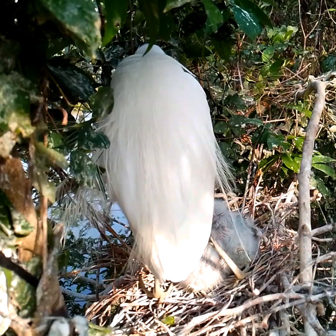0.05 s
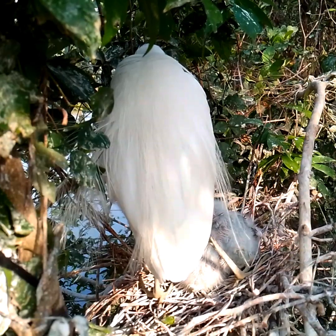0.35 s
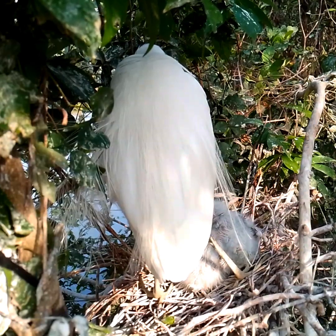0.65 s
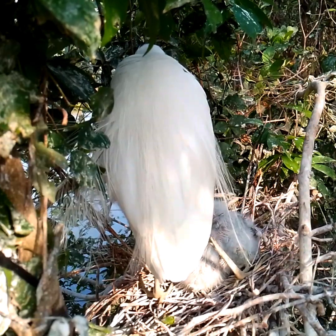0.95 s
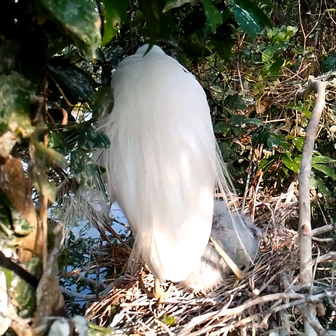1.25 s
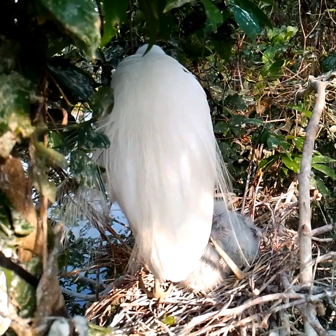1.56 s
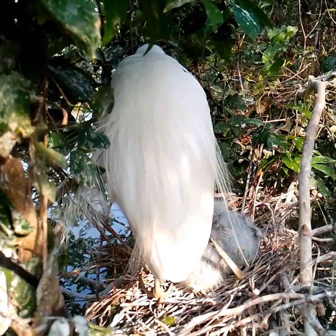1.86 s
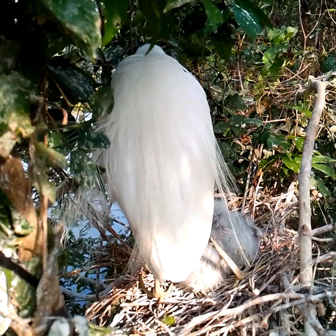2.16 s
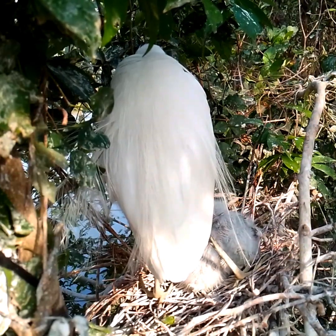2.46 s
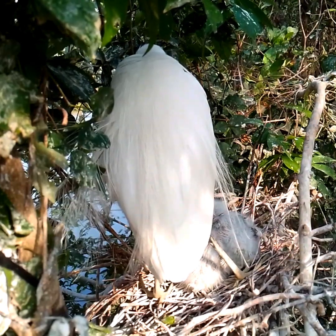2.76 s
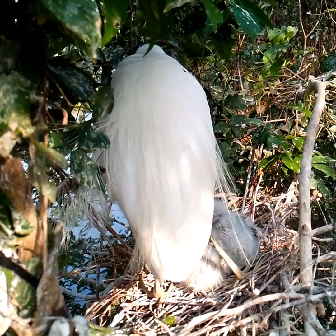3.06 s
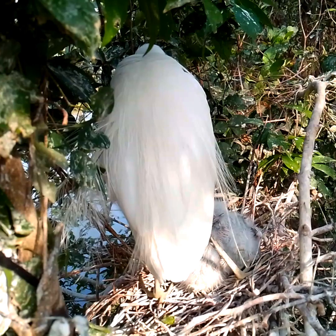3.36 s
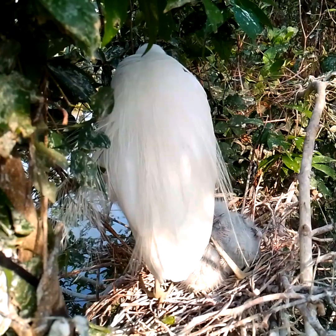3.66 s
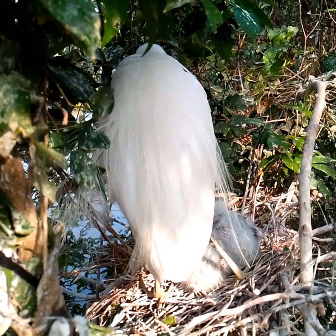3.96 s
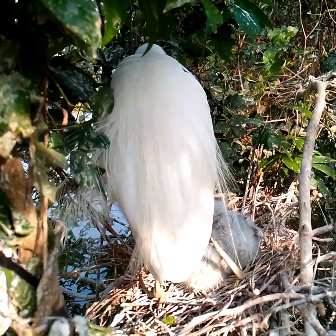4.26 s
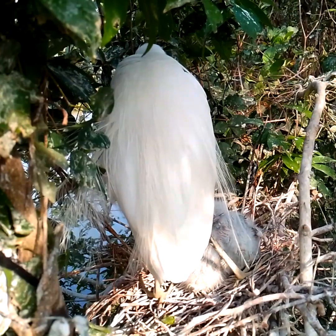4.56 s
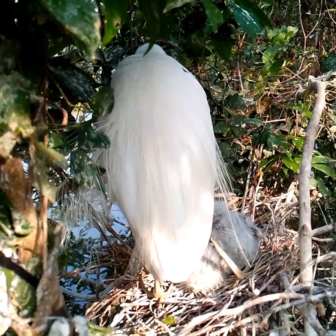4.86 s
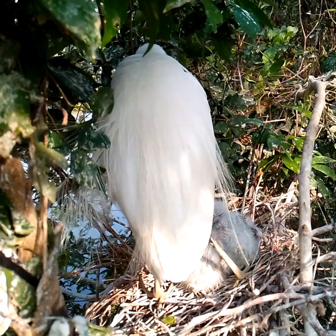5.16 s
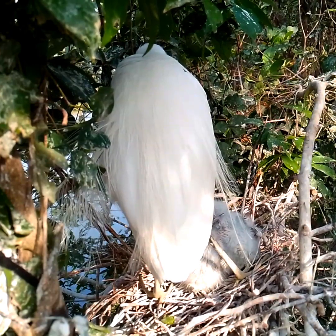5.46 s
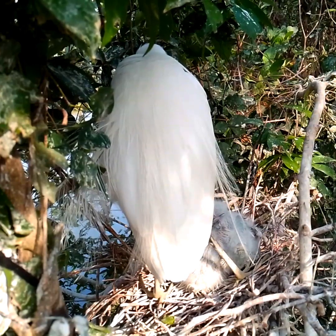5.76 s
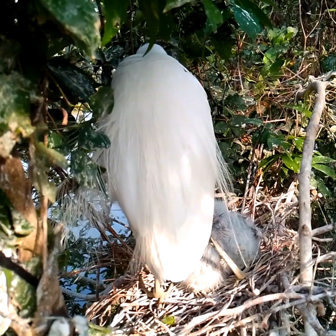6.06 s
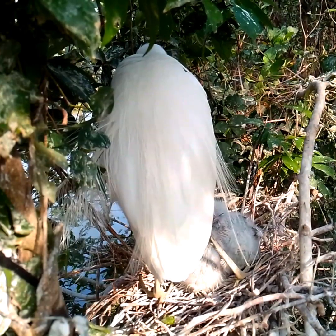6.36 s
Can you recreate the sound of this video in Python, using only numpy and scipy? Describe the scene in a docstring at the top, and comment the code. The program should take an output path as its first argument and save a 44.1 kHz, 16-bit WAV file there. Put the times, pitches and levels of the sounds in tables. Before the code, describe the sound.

Two egret chicks beg from a nest among trees. One keeps up quick, high, falling kek calls throughout; the other adds sharp, stuttering chips at the start and again at the end. Short hoarse squawks break in, the loudest ending in a clear squeal, the next loudest in a thin rustle. A stereo microphone picks up a slight scatter from the foliage and a faint outdoor hush.

```python
"""Among trees, near an egret nest, on a stereo microphone over a faint outdoor hush.
Two chicks beg, one in quick, falling 'kek' calls, one in sharp, stuttering chips: puffs of air from
the syrinx, coloured by throat and mouth. Hoarse squawks break in; the loudest ends in a clear squeal,
the next loudest in a thin rustle. The foliage scatters every call on its way to the microphone,
whose two ports colour the treble differently."""
import sys
import numpy as np
from scipy import signal
from scipy.fft import rfft, irfft, next_fast_len
from scipy.io import wavfile
from scipy.ndimage import map_coordinates

SR = 44100
rng = np.random.default_rng(int(sys.argv[2]) if len(sys.argv) > 2 else 0)


def unload_audio(sound):
    """Save the sound as a 16-bit wav file, at the path given as the first command line argument."""
    columns = np.transpose(np.atleast_2d(sound))
    # keep every value between -1 and 1, then stretch to whole-number steps
    steps = np.round(np.clip(columns, -1, 1) * 32767)
    wavfile.write(sys.argv[1], SR, steps.astype(np.int16))


N = 287532

# spectrum of the outdoor hush: frequency_hz, gain_db
HUSH_COLOUR = [(20, -26), (40, -13), (65, -3.5), (100, -11), (160, -19), (310, -5), (800, -12.5),
               (1560, -16.5), (2860, -6.5), (4480, -11.5), (7820, -5.5), (9410, -17), (11000, -15),
               (14000, -29)]
# decay among the trees: frequency_hz, t60_s
TREE_DECAY = [(300, 0.33), (2500, 0.35), (7500, 0.41), (13000, 0.38)]
# leaves throw back short waves best: frequency_hz, gain_db
LEAF_SCATTER = [(300, -17), (1200, 2.5), (1750, 0.5), (2250, -1), (2850, 5.5), (3400, 0), (3900, 8),
                (4550, 0.5), (5600, 2), (7600, 2), (13000, 9)]
# port balance for the chips, and for all else: frequency_hz, left_minus_right_db
CHIP_BALANCE = [(1000, 0.5), (2000, -1), (3000, 1), (4400, 10.5), (5300, -8), (6200, 26), (7100, 13),
                (8000, 28), (9300, -9), (10700, -12), (12500, -38), (14000, 22)]
NEST_BALANCE = [(1000, 1), (2000, -0.5), (3000, 2), (4400, 1.5), (5300, 6), (6200, 11), (7100, 20),
                (8000, 13), (9300, 2.5), (10700, -18.5), (12500, -12), (14000, 3)]
# rustles in the nest: start_s, length_s, level_db, release_s
RUSTLE_STROKES = [(2.767, 0.094, -51, 0.2), (2.909, 0.013, -49, 0.016)]
# spectrum of a rustle: frequency_hz, gain_db
RUSTLE_SPECTRUM = [(200, -36), (400, -9), (900, -14.5), (1500, -20), (3000, -8), (4600, -5.5), (6500, -6.5),
                   (7800, 8.5), (9300, -10.5), (11000, 2), (12300, -9.5), (13500, -24)]
# throat colour of each kind of call: frequency_hz, gain_db
SQUAWK_COLOUR = [(170, -54), (360, -13), (650, -12), (1100, 4), (1500, -1.5), (2200, -6), (2700, -5.5),
                 (3800, -7), (4700, -5), (6200, -7), (7500, 4), (9300, -10.5), (11000, -4), (13000, -32)]
CHIP_COLOUR = [(400, -35.5), (1200, -21), (2200, -9.5), (2750, -7.5), (3400, -6.5), (4500, -15),
               (5300, -9.5), (6400, -10), (7150, 1.5), (7900, -10.5), (9400, -30), (10800, -22.5),
               (12000, -33), (13500, -50)]
KEK_COLOUR = [(250, -31), (600, -16), (1400, -12.5), (1900, -4.5), (2300, -7), (2850, -7), (4000, -7.5),
              (4650, -7.5), (5500, -4.5), (6500, -10.5), (7900, 2), (9300, -17), (10800, -7.5),
              (13000, -26)]
# squawks, most swelling to their end: start_s, length_s, swell_db, throat_db, voice_db, hiss_db
SQUAWK_CALLS = [(0.523, 0.099, -1, -63, -66, -60.5), (1.023, 0.115, 0, -46, -42, -38.5),
                (1.556, 0.09, 2.5, -65.5, -73, -67), (2.43, 0.13, 8.5, -55, -58.5, -56),
                (2.556, 0.1, 8, -53.5, -43.5, -40), (4.374, 0.059, 4, -54, -57, -53),
                (4.765, 0.1, 4.5, -56.5, -60, -53), (5.071, 0.041, 6, -66, -63, -67)]
# croaks in the two loud squawks, and the squeal: start_s, length_s, level_db, pitch_hz, sag_hz_per_s
CROAK_CALLS = [(1.03, 0.025, -45, 510, 3480), (1.075, 0.055, -54, 372, 200), (2.575, 0.085, -43.5, 462, 60)]
SQUEAL_CALLS = [(1.134, 0.038, -31.5, 1040, 600)]
# their harmonics: multiple, relative_db
CROAK_HARMONICS = [(1, -7), (2, -7), (3, -14), (4, 6), (5, 6), (6, 4), (7, 2), (8, 2.5)]
SQUEAL_HARMONICS = [(1, -9.5), (2, -8), (3, -6), (4, -9.5), (5, -19), (6, -36), (7, -1), (8, -4), (9, -18),
                    (10, -13), (11, -9), (12, -20.5)]
# begging calls of the two chicks; the chip at 1.039 s is a sharp click within the loud squawk: start_s,
# length_s, relative_db, mouth_hz
CHIP_CALLS = [(0.114, 0.02, -45, 2830), (0.318, 0.019, -45, 2928), (0.525, 0.019, -47, 2736),
              (0.655, 0.014, -61, 2670), (0.766, 0.013, -50.5, 2694), (1.039, 0.0113, -41.5, 3270),
              (6.307, 0.019, -44, 2772), (6.507, 0.014, -44.5, 2636)]
KEK_CALLS = [(0.0, 0.02, -57, 2700), (0.07, 0.035, -55.5, 2660), (0.166, 0.027, -56, 2690),
             (0.248, 0.015, -59, 2670), (0.418, 0.012, -57, 2760), (0.58, 0.017, -52, 2733),
             (0.83, 0.028, -53, 2610), (0.91, 0.017, -42, 2830), (1.21, 0.0164, -41, 2770),
             (1.378, 0.032, -55, 2613), (1.475, 0.017, -50.5, 2772), (1.612, 0.026, -60, 3195),
             (1.692, 0.016, -51.5, 3026), (1.846, 0.016, -61, 2810), (1.901, 0.016, -49, 2905),
             (2.086, 0.023, -57.5, 2914), (2.226, 0.011, -59.5, 2934), (2.31, 0.029, -46, 3355),
             (2.438, 0.037, -57, 2656), (2.546, 0.023, -45.5, 2860), (2.758, 0.018, -40, 3027),
             (3.21, 0.021, -59, 2675), (3.358, 0.0083, -52.5, 3225), (3.484, 0.023, -55, 2580),
             (3.528, 0.036, -60, 2580), (3.665, 0.025, -50.5, 3060), (3.733, 0.05, -53.5, 2854),
             (3.906, 0.054, -51, 2870), (3.998, 0.015, -46.5, 2886), (4.139, 0.013, -45.5, 2863),
             (4.263, 0.01, -48, 2802), (4.36, 0.014, -50, 2798), (4.512, 0.023, -52.5, 2870),
             (4.748, 0.021, -55.5, 2856), (4.983, 0.022, -50.5, 3047), (5.128, 0.007, -58.5, 2380),
             (5.209, 0.011, -50.5, 2843), (5.336, 0.012, -60, 2980), (5.248, 0.018, -48, 2840),
             (5.474, 0.016, -47, 2893), (5.693, 0.013, -47.5, 2760), (5.736, 0.026, -49, 2690),
             (5.893, 0.02, -53.5, 2580), (5.929, 0.016, -44, 2770), (6.01, 0.018, -50, 2856),
             (6.102, 0.021, -45.5, 2580), (6.182, 0.012, -43.5, 2740), (6.27, 0.022, -50.5, 2840)]
# the keks' treble over their voice band: time_s, treble_db
KEK_BRIGHTNESS = [(0.9, 1.5), (1.5, 5.5), (2.76, 6.5), (3.25, 2.5), (4.2, -1), (4.4, 3), (5.7, 1.5),
                  (6.2, 2)]

THROAT_EDGE_HZ, VOICE_EDGE_HZ = 1690, 4770  # tops of the throat and voice bands


def amp(db):
    """Decibels to gain."""
    return 10 ** (np.asarray(db) / 20)


def unit(x):
    """Scale to rms 1."""
    return x / np.sqrt(np.mean(x ** 2) + 1e-20)


def along(points, hz):
    """Interpolate (frequency_hz, value) points on a log axis."""
    frequencies, values = np.transpose(points)
    return np.interp(np.log(hz + 1), np.log(frequencies + 1), values)


def wobble(rate, size):
    """A smooth random curve, rate knots a second."""
    knots = rng.standard_normal(int(size * rate / SR) + 4)
    return map_coordinates(knots, [np.arange(size) * rate / SR])


def filtered(x, response):
    """Multiply the spectrum of x by response(hz)."""
    size = x.shape[-1]
    padded = next_fast_len(size + 2048)
    return irfft(rfft(x, padded) * response(np.fft.rfftfreq(padded, 1 / SR)), padded)[..., :size]


def below(hz, edge_hz):
    """Share of the power that a steep crossover sends to its low side."""
    return 1 / (1 + (hz / edge_hz) ** 16)


def envelope(t, length, attack, release):
    """Rises over attack, holds until length, then dies by 1/e every release seconds."""
    return np.clip(t / attack, 0, 1) * np.exp(-np.maximum(t - length, 0) / release)


def hush(level_db, side_db, drift_db):
    """Faint outdoor air: nearly mono in the bass, wide in the treble."""
    mid, side = filtered(rng.standard_normal((2, N)), lambda hz: amp(along(HUSH_COLOUR, hz)))
    side = filtered(side, lambda hz: amp(side_db * below(hz, 530)))
    return amp(level_db + drift_db * wobble(6, N)) * unit(np.array([mid + side, mid - side]))


def foliage(x, near_db, near_t60_s, far_db):
    """Nearby twigs and leaves scatter a short, spiky answer; the trees farther off add a longer one."""
    hz, t, spectra = signal.stft(rng.standard_normal((2, SR // 2)), SR, nperseg=256)
    far = signal.istft(spectra * amp(-60 * t / along(TREE_DECAY, hz)[:, None]), SR, nperseg=256)[1]
    t = np.arange(far.shape[1]) / SR
    far *= np.minimum(t / 0.027, 1)
    near = rng.standard_normal(far.shape) ** 3 * amp(-60 * t / near_t60_s) * np.minimum(t / 0.00064, 1)
    norm = lambda h: h / np.linalg.norm(h, axis=1, keepdims=True)
    echoes = amp(near_db) * norm(near) + amp(far_db) * norm(far)
    thrown = filtered(x, lambda hz: amp(along(LEAF_SCATTER, hz)))
    return signal.fftconvolve(thrown[None], echoes, axes=1)[:, :N]


def direct(x, lead_ms):
    """The straight path from the nest reaches the left port lead_ms before the right."""
    advance_s = np.array([[0.5], [-0.5]]) * lead_ms / 1000
    return filtered(x, lambda hz: np.exp(2j * np.pi * hz * advance_s))


def ports(pair, balance):
    """Each microphone port has its own treble resonance; their summed power stays the same."""
    def gains(hz):
        ratio = amp(along(balance, hz))
        return np.array([ratio, np.ones_like(hz)]) * np.sqrt(2 / (1 + ratio ** 2))
    return filtered(pair, gains)


def rustle(grain_db, uneven_db):
    """Fine, crackly hiss, as of feathers brushing dry twigs."""
    t = np.arange(N) / SR
    strokes = sum(amp(db) * envelope(t - start, length, attack=0.014, release=release)
                  for start, length, db, release in RUSTLE_STROKES)
    grains = rng.standard_normal(N) * amp(grain_db * wobble(400, N))
    crackle = unit(filtered(grains, lambda hz: amp(along(RUSTLE_SPECTRUM, hz))))
    return strokes * amp(uneven_db * wobble(24.54, N)) * crackle


def syrinx(pitch_hz, jitter, noise_share):
    """One puff per cycle of an unsteady membrane, mixed with air noise gated by the same cycle."""
    size = len(pitch_hz)
    phase = 2 * np.pi * np.cumsum(pitch_hz * np.exp(jitter * wobble(600, size))) / SR
    puffs = unit(sum(np.cos(k * phase) for k in range(1, 20)))
    breath = unit(rng.standard_normal(size) * (1 + 0.65 * np.cos(phase)))
    return np.sqrt(1 - noise_share) * puffs + np.sqrt(noise_share) * breath


def squawks():
    """The syrinx flaps chaotically; the throat band opens last and shuts first, the hiss lingers."""
    pitch_hz = 380 * np.exp(0.1 * wobble(25, N))
    rasp = syrinx(pitch_hz, jitter=0.16, noise_share=0.4) * amp(1.8 * wobble(220, N))
    part = lambda share: unit(
        filtered(rasp, lambda hz: amp(along(SQUAWK_COLOUR, hz)) * np.sqrt(share(hz))))
    throat = part(lambda hz: below(hz, THROAT_EDGE_HZ))
    voice = part(lambda hz: below(hz, VOICE_EDGE_HZ) * (1 - below(hz, THROAT_EDGE_HZ)))
    hiss = part(lambda hz: 1 - below(hz, VOICE_EDGE_HZ))
    out, t = np.zeros(N), np.arange(SR // 2) / SR
    for start, length, swell_db, throat_db, voice_db, hiss_db in SQUAWK_CALLS:
        span = round(start * SR) + np.arange(len(t))
        effort = amp(swell_db * np.minimum(t / length - 1, 0))
        out[span] += effort * (amp(throat_db) * envelope(t, length, 0.051, 0.015) * throat[span]
                               + amp(voice_db) * envelope(t, length, 0.0056, 0.016) * voice[span]
                               + amp(hiss_db) * envelope(t, length, 0.018, 0.037) * hiss[span])
    return out


def pitched_cries(table, harmonics, jitter, flutter_db, attack_share, release_s, droop):
    """The membrane locks into a nearly regular swing; its pitch sags, and droops when effort is low."""
    out, t = np.zeros(N), np.arange(SR // 6) / SR
    for start, length, db, pitch_hz, sag in table:
        effort = envelope(t, length, attack_share * length, release_s)
        pitch = (pitch_hz - sag * np.minimum(t, length)) * (1 - droop * (1 - effort))
        phase = 2 * np.pi * np.cumsum(pitch * (1 + jitter * wobble(500, len(t)))) / SR
        tone = unit(sum(amp(level) * np.sin(k * phase) for k, level in harmonics))
        out[round(start * SR):][:len(t)] += amp(db + flutter_db * wobble(196, len(t))) * effort * tone
    return out


def begging(table, treble_db, throat, fall_per_s, jitter, noise_share, stutter_db, stutter_per_s,
            attack_share, release_s, mouth_db, mouth_width_hz, overtone_db, beak_db,
            hum_db, hum_release_s):
    """Short syrinx bursts; as the pitch sags, harmonic 3 or 4 sweeps through the mouth resonance."""
    out, t = np.zeros(N + SR), np.arange(SR // 6) / SR
    for start, length, voice_db, mouth_hz in table:
        harmonic = rng.choice([3, 3, 4])
        pitch_hz = mouth_hz / harmonic * np.exp(-fall_per_s * (t - length / 2))
        source = syrinx(pitch_hz, jitter, noise_share)
        source *= amp(stutter_db * np.tanh(wobble(stutter_per_s, len(t))))
        # the louder the call, the more its mouth resonance stands out
        effort = np.clip((voice_db + 61.5) / 13, 0.5, 1.5)
        peak = lambda hz: effort / (1 + ((hz - mouth_hz) / mouth_width_hz) ** 2)
        mouth = lambda hz: mouth_db * peak(hz) + overtone_db * peak(hz / 2)
        # the beak is held a little differently for every call
        bumps = rng.standard_normal(64)
        beak = lambda hz: beak_db * np.interp(hz, np.linspace(0, SR / 2, len(bumps)), bumps)
        colour = lambda hz: amp(along(throat, hz) + mouth(hz) + beak(hz))
        voice = filtered(source, lambda hz: colour(hz) * np.sqrt(below(hz, VOICE_EDGE_HZ)))
        treble = filtered(source, lambda hz: colour(hz) * np.sqrt(1 - below(hz, VOICE_EDGE_HZ)))
        # the treble opens a little after the voice; the soft fundamental slides on after both
        attack_s, held = attack_share * length, t < length
        voice *= envelope(t, length, attack_s, release_s) / np.std(voice[held])
        treble *= envelope(t, length, 2.3 * attack_s, release_s) / np.std(treble[held])
        hum = np.sin(2 * np.pi * np.cumsum(pitch_hz) / SR) * envelope(t, length, attack_s, hum_release_s)
        call = voice + amp(treble_db(start)) * treble + amp(hum_db) * hum
        out[round(start * SR):][:len(t)] += amp(voice_db) * call
    return out[:N]


def chipping_chick():
    """Sharp, stuttering chips: mostly breath, through a narrow mouth resonance."""
    return begging(CHIP_CALLS, treble_db=lambda start: 8, throat=CHIP_COLOUR,
                   fall_per_s=8, jitter=0.0963, noise_share=0.71, stutter_db=4.5, stutter_per_s=388,
                   attack_share=0.013, release_s=0.0012, mouth_db=7.5, mouth_width_hz=56,
                   overtone_db=1, beak_db=2.5, hum_db=-27, hum_release_s=0.048)


def kekking_chick(soft_per_s):
    """Quick, falling keks, mostly tone, with faint ones strewn at random among them."""
    kek = dict(throat=KEK_COLOUR, fall_per_s=9, jitter=0.0331, noise_share=0.25,
               stutter_db=3.5, stutter_per_s=244, attack_share=0.093, release_s=0.0028,
               mouth_db=9.5, mouth_width_hz=240, overtone_db=2.5, beak_db=3.5,
               hum_db=-26.5, hum_release_s=0.055)
    loud = begging(KEK_CALLS, lambda start: np.interp(start, *np.transpose(KEK_BRIGHTNESS)), **kek)
    count = int(soft_per_s * N / SR)
    starts = (np.arange(count) + rng.random(count)) / soft_per_s
    soft_calls = [(start, 0.018, -61 - rng.normal(), rng.normal(2854, 250)) for start in starts]
    return loud + begging(soft_calls, treble_db=lambda start: 4, **kek)


def scene():
    """Two begging chicks, the squawks and a rustle reach the microphone from the same thicket."""
    keks = amp(-2.5) * kekking_chick(soft_per_s=4)
    chips = amp(0.5) * chipping_chick()
    squeal = pitched_cries(SQUEAL_CALLS, SQUEAL_HARMONICS, jitter=0.008, flutter_db=2,
                           attack_share=0.28, release_s=0.0065, droop=0.02)
    croaks = pitched_cries(CROAK_CALLS, CROAK_HARMONICS, jitter=0.018, flutter_db=5,
                           attack_share=0.55, release_s=0.015, droop=0.12)
    cries = squawks() + squeal + croaks + rustle(grain_db=3, uneven_db=-1.2)
    nest = direct(keks + cries, lead_ms=0.317)
    nest += foliage(keks, near_db=-3, near_t60_s=0.11, far_db=-8)
    nest += foliage(cries, near_db=-3, near_t60_s=0.054, far_db=-11)
    chip_pair = direct(chips, lead_ms=-0.14) + foliage(chips, near_db=-7, near_t60_s=0.13, far_db=-7.5)
    air = hush(level_db=-64, side_db=-9, drift_db=0.5)
    return ports(nest + air, NEST_BALANCE) + ports(chip_pair, CHIP_BALANCE)


def record(dry, top_hz=14300):
    """The camera keeps nothing above its band limit."""
    return filtered(dry, lambda hz: hz < top_hz)


dry = scene()
out = record(dry)
unload_audio(out)
```